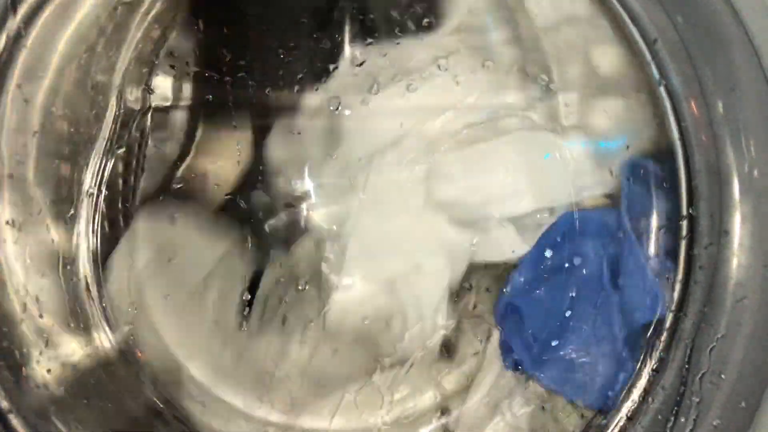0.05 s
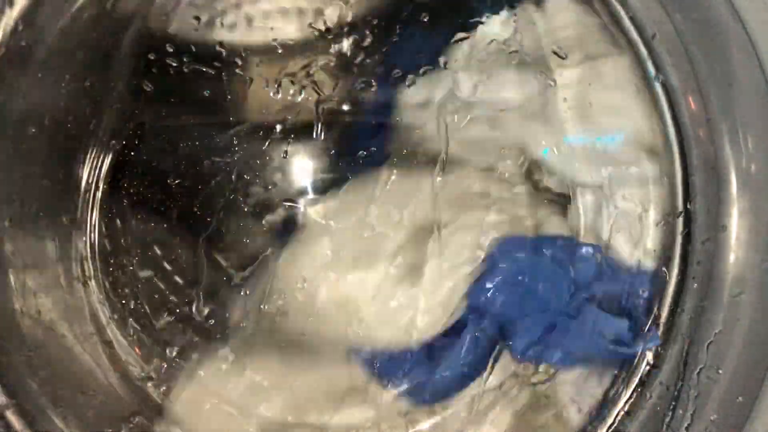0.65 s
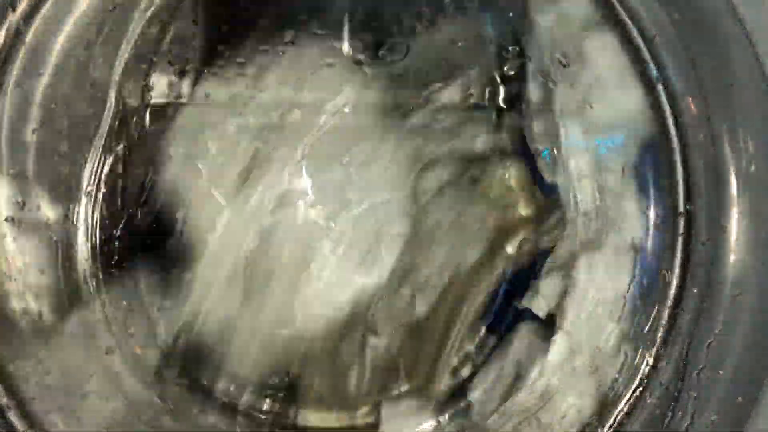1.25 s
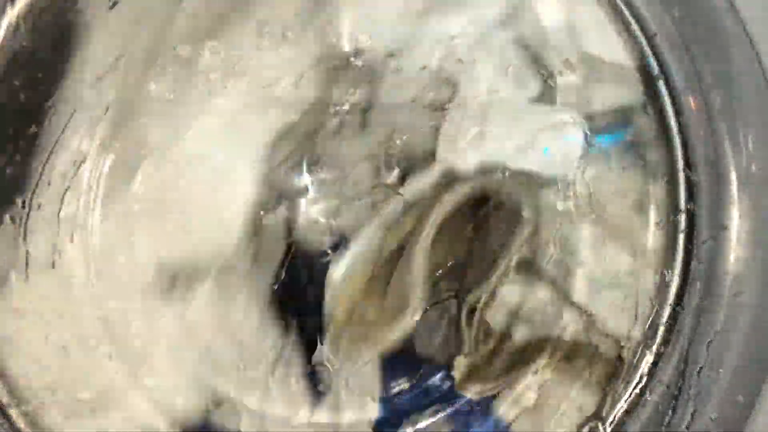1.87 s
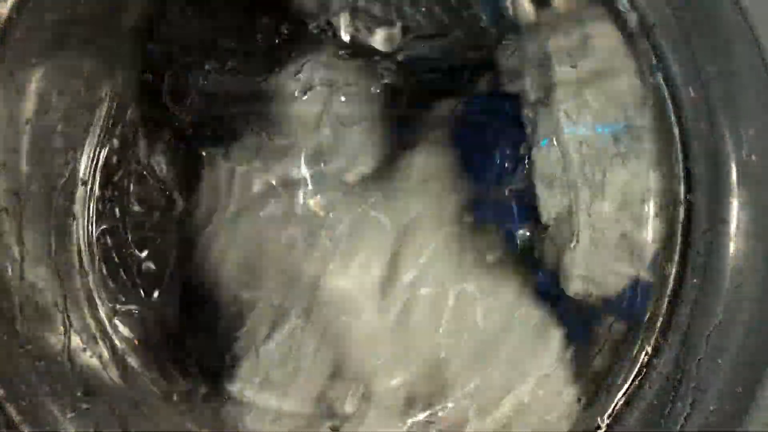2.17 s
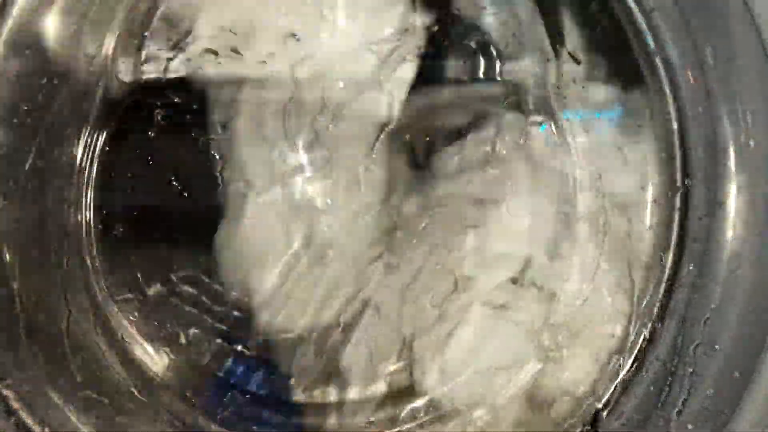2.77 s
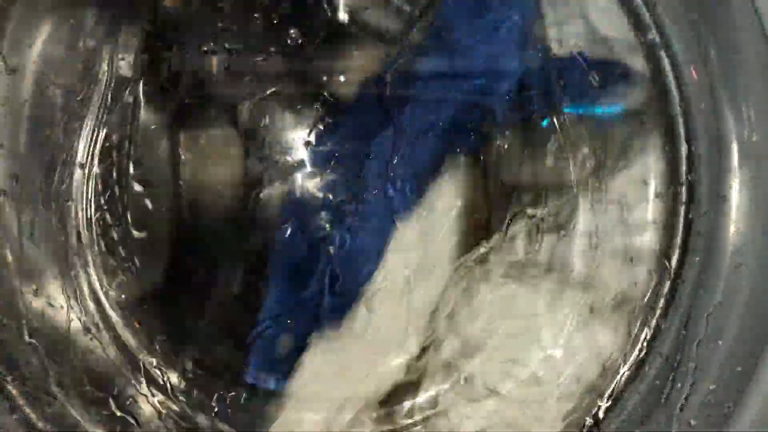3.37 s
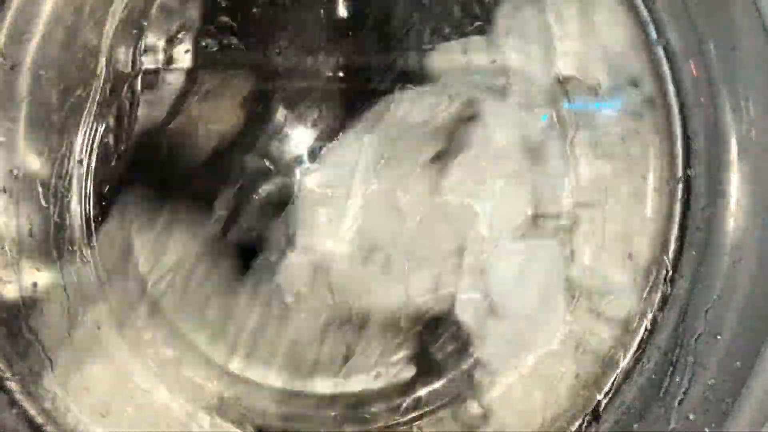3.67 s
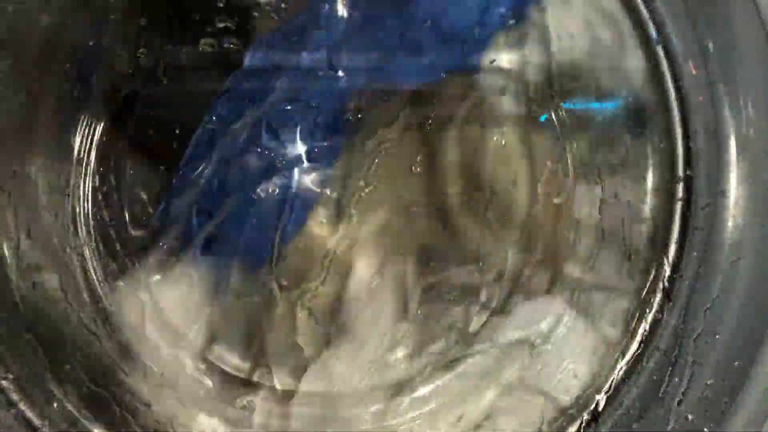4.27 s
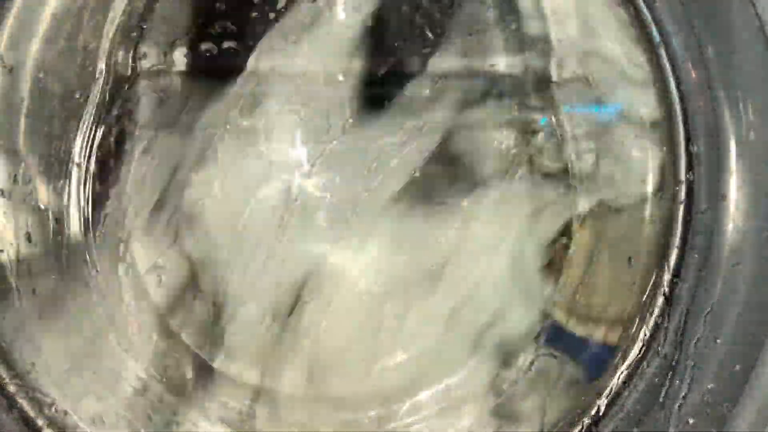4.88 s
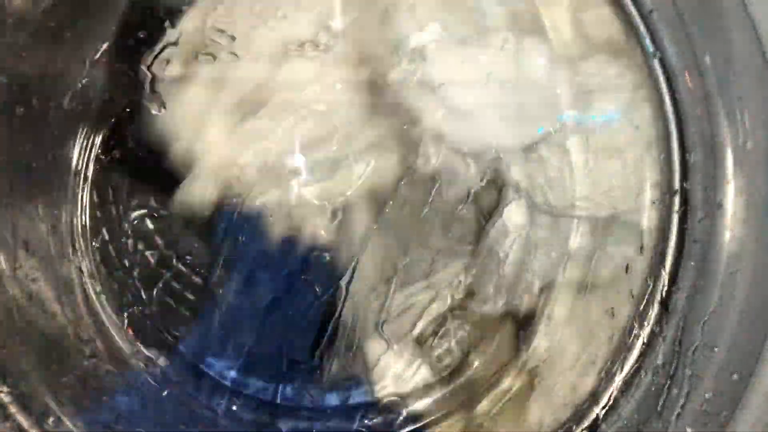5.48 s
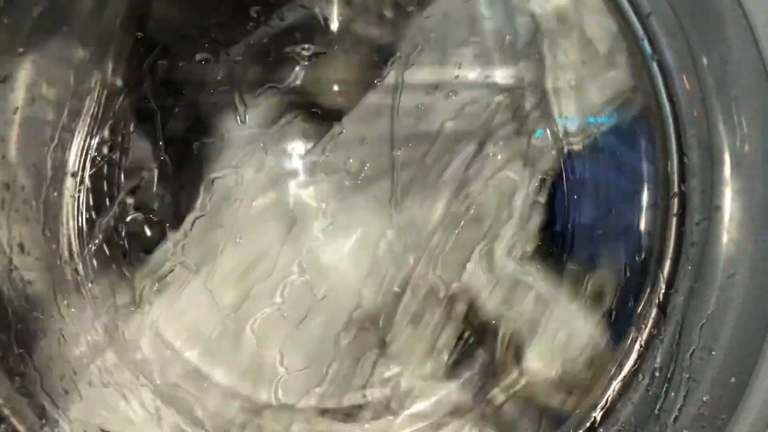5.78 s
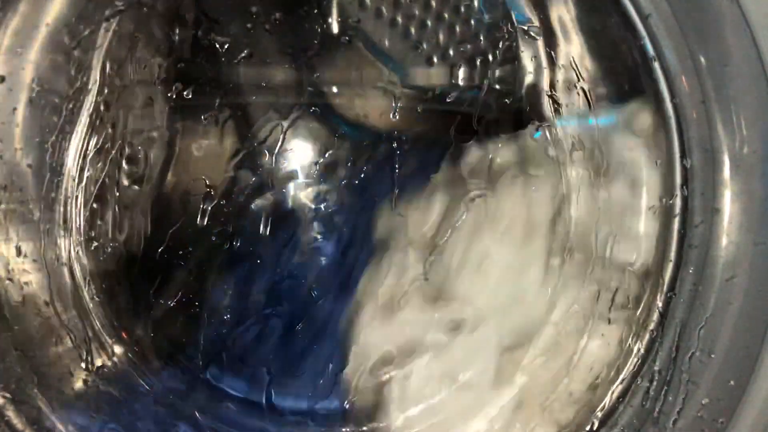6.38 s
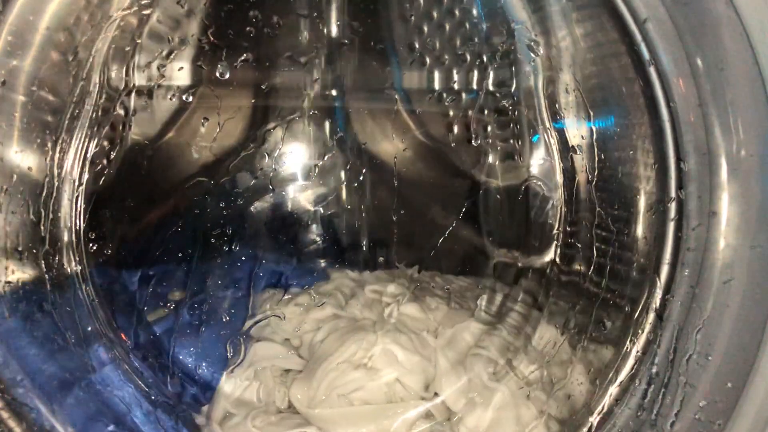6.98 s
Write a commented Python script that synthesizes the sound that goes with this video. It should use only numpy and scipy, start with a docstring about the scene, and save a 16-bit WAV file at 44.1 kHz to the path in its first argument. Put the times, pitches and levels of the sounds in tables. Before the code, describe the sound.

Soaked clothes slap and splash in a droning washer drum until the motor cuts out and the water settles over a quiet hum.

```python
"""Washing machine at the door

One microphone, close to the glass of a front-loader tumbling wet laundry. A drone just below the mains hum
beats against it, water churns in the tub and soaked cloth slaps down at every turn. After a last heavy fall the
drum stops: water drains and fizzes out of the heap over a faint hum."""
import sys
import numpy as np
from scipy import signal
from scipy.fft import rfft, irfft, next_fast_len
from scipy.io import wavfile

SR = 44100
rng = np.random.default_rng(int(sys.argv[2]) if len(sys.argv) > 2 else 0)


def store_pcm(level_fs):
    """Save levels as 16-bit WAV."""
    pcm = np.round(np.clip(level_fs, -1, 1) * 32767).astype(np.int16)
    wavfile.write(sys.argv[1], SR, np.atleast_2d(pcm).T)


N = 319284
TIME = np.arange(N) / SR
MAINS_HUM_HZ, POWER_OFF_S = 99.96, 6.15

# wet cloth landing: peak t/s, rise/s, then relative level/dB of thud, splat and spray
SLAPS = [(0.415, 0.02, -45, -39, -47.5), (0.568, 0.015, -39.5, -36, -46.5), (0.813, 0.015, -60, -53, -48),
         (0.95, 0.016, -63, -45, -51.5), (1.128, .003, -43, -44, -50.5), (1.314, 0.0071, -45, -47, -46),
         (1.38, .028, -43.5, -42, -52), (1.464, 0.018, -48, -42.5, -48.5), (1.747, .007, -42, -39, -51),
         (1.846, 0.021, -43, -36.5, -45.5), (2.375, 0.0062, -45, -43, -45),
         (2.4, 0.0047, -42, -37.5, -44.5), (2.528, .009, -63, -41.5, -47.5),
         (2.643, 0.02, -38.5, -46, -44.5), (2.81, 0.01, -40, -39.5, -45), (3.062, .003, -42, -42.5, -49.5),
         (3.329, .004, -45, -39.5, -47), (3.433, 0.01, -45, -57, -52), (3.505, 0.017, -45.5, -40, -48),
         (3.77, 0.041, -47, -41, -48.5), (3.817, 0.012, -41.5, -46, -48), (4.38, 0.0081, -40.5, -35.5, -47),
         (4.457, 0.0098, -45.5, -39, -50), (4.612, 0.0044, -42.5, -36.5, -46),
         (4.715, 0.023, -46.5, -39.5, -48.5), (5.035, .003, -40, -38, -56),
         (5.337, 0.0082, -38, -38, -44.5), (5.382, 0.012, -40, -38.5, -50.5),
         (5.529, 0.0076, -57, -39, -54), (5.599, 0.009, -56, -44, -48.5), (5.732, 0.013, -39, -34.5, -43.5),
         (5.818, 0.0027, -47, -40.5, -57), (5.961, 0.017, -44, -44, -63), (6.001, 0.0047, -55, -42.5, -43),
         (6.22, 0.0078, -59, -38.5, -52), (6.245, .012, -42, -37, -41.5), (6.43, 0.014, -64, -49.5, -56),
         (6.535, 0.033, -51, -52, -55.5), (6.7, 0.02, -74, -72, -61)]
# spectrum of water splatting out of the cloth: f/Hz, relative level/dB
SPLAT_SPECTRUM = [(500, -37), (900, 11), (1300, 8), (1800, 5.5), (2500, -2.5), (3200, -28), (5000, -9.5)]


def from_db(db):
    """Decibels to gain."""
    return 10 ** (np.asarray(db) / 20)


def rms_one(x):
    """Scale to unit power."""
    return x / np.sqrt(np.mean(x ** 2) + 1e-20)


def in_time(rows):
    """Each column of a curve, sample by sample."""
    times, *columns = np.transpose(rows)
    return [np.interp(TIME, times, column) for column in columns]


def drift(hz):
    """A slow random wander, mostly below hz; rms 1."""
    hop, settle = 40, 2000
    r = np.exp(-2 * np.pi * hz * hop / SR)
    slow = signal.lfilter([1], [1, -2 * r, r * r], rng.standard_normal(N // hop + settle + 2))[settle:]
    return np.interp(np.arange(N) / hop, np.arange(len(slow)), rms_one(slow))


def coloured(x, spectrum):
    """Give a signal a smooth spectrum that rolls off at both ends; rms 1."""
    size = next_fast_len(N)
    hz, db = np.transpose(spectrum)
    bins = np.arange(size // 2 + 1) * SR / size + 1
    curve = np.interp(np.log(bins), np.log(hz), db)
    skirts = np.minimum(bins / hz[0], 1) ** 2 * np.minimum(hz[-1] / bins, 1) ** 2
    return rms_one(irfft(rfft(x, size) * from_db(curve) * skirts, size)[:N])


def resonance(x, hz, width_hz):
    """Two-pole band-pass with gain 1 on top."""
    r = np.exp(-np.pi * width_hz / SR)
    feedback = [1, -2 * r * np.cos(2 * np.pi * hz / SR), r * r]
    return signal.lfilter(np.array([1, 0, -1]) * (1 - r * r) / 2, feedback, x + 1e-18)


def wavering(hz, unsteady, drift_hz):
    """A tone whose strength and phase waver, unsteady from 0 to 1; rms 1."""
    phase = 2 * np.pi * (hz * TIME + rng.random())
    steady = np.sqrt(2 * (1 - unsteady ** 2)) * np.sin(phase)
    wander = drift(drift_hz) * np.sin(phase) + drift(drift_hz) * np.cos(phase)
    return rms_one(steady + unsteady * wander)


def released(seconds):
    """1 while the motor is powered, then a smooth fall."""
    return np.exp(-(np.maximum(TIME - POWER_OFF_S, 0) / seconds) ** 2)


def motor():
    """Drone and mains hum beat under the windings' buzz; at power-off only the drone lingers."""
    # the motor under shifting load: t/s, throb lag/s, drone/dB, hum/dB, buzz/dB, upper buzz lift/dB
    load_curve = [(0.0, -0.036, -33.5, -44, -44, -0.5), (0.18, -0.046, -45, -54, -43, 6),
                  (0.35, 0.03, -37.5, -52, -46.5, -5), (0.6, -0.013, -40.5, -41.5, -41.5, -4),
                  (1.07, 0.035, -36.5, -43.5, -40, -1), (1.45, -0.011, -48, -39, -45.5, 0.5),
                  (2.05, 0.068, -36.5, -45, -43.5, 1.5), (2.4, -0.0069, -42, -42, -41, -5),
                  (2.7, -0.0071, -44, -43, -43.5, 2.5), (3.4, 0.0034, -38.5, -46.5, -44, -0.5),
                  (4.1, -0.028, -38, -41, -44.5, 3.5), (4.45, .035, -39, -43.5, -43, 2.5),
                  (4.95, -0.019, -40, -45, -45.5, 3), (5.55, 0.018, -36.5, -44, -43, 0),
                  (6.0, -0.056, -38.5, -47, -44, 0.5)]
    # buzz of the windings: multiple of the hum, relative level/dB, unsteadiness/0-1
    partials = [(2, 0, 0.4), (3, -5.5, 0.45), (4, -18.5, 1), (5, -18.5, 0.53), (6, -19, 0.52)]
    throb_hz, trough_s = 2.46, 3.58
    lag, drone_db, hum_db, buzz_db, edge_db = in_time(load_curve)
    mains = 2 * np.pi * MAINS_HUM_HZ * TIME
    beat = 2 * np.pi * throb_hz * (TIME - trough_s - lag)
    drone = from_db(drone_db + 0.77 * drift(hz=11)) * np.sin(mains - beat + 0.1 * drift(hz=9.6))
    sideband = from_db(-9) * np.sin(mains + beat)
    hum = from_db(hum_db) * (np.sin(mains) + sideband)
    lowest, *upper = [from_db(db) * wavering(k * MAINS_HUM_HZ, unsteady, drift_hz=13.2)
                      for k, db, unsteady in partials]
    buzz = (lowest + from_db(edge_db) * sum(upper)) * from_db(buzz_db + 0.83 * drift(hz=7.7))
    buzz *= 1 - 0.091 * np.cos(beat)
    return (np.sqrt(2) * hum + buzz) * released(seconds=0.03) - np.sqrt(2) * drone * released(seconds=0.42)


def boom():
    """The tub booms on its springs at its own low pitch."""
    # swell of the boom: t/s, relative level/dB
    swell = [(0.0, -58), (4.1, -55), (4.8, -45), (5.5, -54), (6.5, -46), (7.24, -58)]
    return from_db(in_time(swell)[0] - 7.5) * wavering(70.5, unsteady=0.51, drift_hz=1.6)


def idle():
    """The machine's soft rush and faint hum, which go on after the drum stops."""
    # spectrum of the rush: f/Hz, relative level/dB
    rush_spectrum = [(28, -1), (50, -2), (110, 1.5), (190, 1.5), (260, -4.5), (360, -1), (480, -27),
                     (660, -6.5), (880, -0.5), (1050, -6.5), (1300, -21), (2300, -25), (7000, -47),
                     (15700, -26)]
    hum = wavering(MAINS_HUM_HZ, unsteady=0.46, drift_hz=4.9)
    hum += wavering(2 * MAINS_HUM_HZ, unsteady=1.0, drift_hz=7.3)
    return from_db(-52.5) * coloured(rng.standard_normal(N), rush_spectrum) + from_db(-59.5) * hum


def spurts(per_s, decay_s):
    """Little gushes start at once and die away; centred on 0, spread about 1."""
    starts = rng.exponential(1, N) * (rng.random(N) < per_s / SR)
    gush = signal.lfilter([1], [1, -np.exp(-1 / (decay_s * SR))], starts + 1e-18)
    return np.minimum(rms_one(gush - gush.mean()), 4)


def droplets(per_s, spread_db):
    """Random tiny impacts of uneven size; rms 1."""
    at = np.flatnonzero(rng.random(N) < per_s / SR)
    size, sign = rng.random((2, N), dtype=np.float32)[:, at]
    out = np.zeros(N)
    out[at] = from_db(spread_db * np.minimum(-np.log(1 - size), 4)) * np.sign(sign - .5)
    return rms_one(out)


def bubbles(per_s, spread_db, q, sizes=22):
    """Bubbles of many sizes, each ringing briefly at its own pitch; rms 1."""
    births = droplets(per_s, spread_db)
    size = rng.integers(0, sizes, N)
    pitches = np.geomspace(400, 2800, sizes)
    return rms_one(sum(resonance(births * (size == k), hz, hz / q) for k, hz in enumerate(pitches)))


def shaded(x, depth):
    """Moving folds open and shade six bands at random; rms 1."""
    flicker = sum(drift(hz=17) * resonance(x, hz, hz / 1.6) for hz in np.geomspace(900, 12000, 6))
    return rms_one(x + depth * flicker)


def churn():
    """Water is dragged round with the load: a gurgling wash, a fine spray and drops on the glass."""
    # churning, dying away once the drum rests: t/s, relative level/dB of wash and spray
    flow = [(0.0, -62, -56), (0.2, -47.5, -55.5), (0.6, -43, -54.5), (3.3, -45.5, -54), (5.9, -43.5, -54),
            (6.18, -47, -54.5), (6.35, -50, -61), (6.65, -53.5, -59.5), (6.9, -64, -65.5),
            (7.24, -63.5, -67.5)]
    # spectra of the wash and the spray: f/Hz, relative level/dB
    wash_spectrum = [(28, -32), (45, 2), (70, 11), (140, 7), (250, 6.5), (420, 2), (650, -1), (900, -3.5),
                     (1300, -4), (2000, -11), (3000, -13.5), (6000, -78)]
    spray_spectrum = [(1200, 3.5), (2400, 3.5), (3200, 2.5), (4500, 1), (6500, -1.5), (8500, -4.5),
                      (11000, -9.5), (13000, -13), (15700, -18)]
    wash_db, spray_db = in_time(flow)
    surge = spurts(per_s=35, decay_s=0.012)
    gurgle = rng.standard_normal(N) + from_db(-7) * bubbles(per_s=500, spread_db=1.5, q=17.7)
    patter = rng.standard_normal(N) + from_db(0.5) * droplets(per_s=2500, spread_db=-0.5)
    wash = from_db(wash_db - 0.97 + 0.29 * surge + 1.6 * drift(hz=1)) * coloured(gurgle, wash_spectrum)
    spray = from_db(spray_db + 0.76 + surge) * shaded(coloured(patter, spray_spectrum), depth=0.15)
    drops = sum(resonance(droplets(per_s=9.2, spread_db=3.0), hz, 300) for hz in (7200, 10400, 13800))
    return wash + spray + from_db(spray_db - 19.5) * rms_one(drops)


def tub(x, contact):
    """Tub and door add their own ring, the more the firmer they are touched; the power is kept."""
    # resonances of tub and door: f/Hz, width/Hz, lift/dB at contact 1
    modes = [(414.7, 11, 7.5), (560, 35, 3.5), (767, 68, 7), (846, 37, 7), (1159, 53, 7), (1389, 15, 8.5),
             (1653, 58, 5), (2415, 58, 7.5), (2616, 39, 4.5), (2994, 26, 5), (3360, 57, 5.5),
             (4213, 40, 9.5), (5200, 22, 7), (6500, 93, 5.5), (8250, 84, 7.5), (11420, 120, 7)]
    rung = x + sum((from_db(db * contact) - 1) * resonance(x, hz, width) for hz, width, db in modes)
    return np.std(x) * rms_one(rung)


def slaps():
    """Soaked cloth lands fold by fold: spray flies first, trapped water splats, then the drum thuds."""
    # how fast a slap's power dies away: decay/s of thud, splat and spray
    fall_s = [0.021, 0.017, 0.013]
    lag_s = np.array([[.004], [0], [-.002]])
    power = np.zeros((3, N))
    for peak_s, rise_s, *levels in SLAPS:
        near = slice(max(int((peak_s - .1) * SR), 0), int((peak_s + .2) * SR))
        t = TIME[near] - peak_s - lag_s
        rising = np.exp(-np.abs(t / rise_s) ** 1.86)
        falling = np.exp(-np.abs(t / np.array(fall_s)[:, None]))
        power[:, near] += from_db(levels)[:, None] ** 2 * np.where(t < 0, rising, falling)
    # spectra of the drum's thud and the flying spray: f/Hz, relative level/dB
    thud_spectrum = [(30, -18), (55, -7), (130, 10), (280, 5), (450, 3.5), (800, 0), (1100, -10),
                     (2000, -14.5)]
    spray_spectrum = [(1800, 5.5), (3000, 6), (4300, 1.5), (6000, -4), (8500, -4), (11500, -7.5),
                      (15700, -16)]
    thud, splat, spray = np.sqrt(power)
    thud *= coloured(droplets(per_s=3000, spread_db=5.5), thud_spectrum)
    splat *= coloured(droplets(per_s=4000, spread_db=3.0), SPLAT_SPECTRUM)
    spray *= shaded(coloured(droplets(per_s=6300, spread_db=-2.5), spray_spectrum), depth=0.38)
    return from_db(2.5) * thud + from_db(-5.0) * splat + from_db(0.5) * spray


def smacks():
    """A fold that lands flat smacks the steel just before its slap peaks; the load damps the ring."""
    flat_rise_s, lead_s, t60_s = 0.0096, 0.0032, 0.032
    envelope = np.zeros(N)
    t = np.arange(SR // 10) / SR
    strike = from_db(-60 * t / t60_s) * (1 - np.exp(-t / .0006))
    for peak_s, rise_s, _, splat_db, _ in SLAPS:
        start = int((peak_s - lead_s) * SR)
        flatness = np.exp(-(rise_s / flat_rise_s) ** 2)
        envelope[start:start + len(t)] += flatness * from_db(splat_db + 5.5) * strike
    return envelope * coloured(rng.standard_normal(N), SPLAT_SPECTRUM)


def thumps(rings=9):
    """The heap smothers its impact as it sinks in: the ring falls from a slap to a low thud."""
    # the whole heap dropping at once: t/s, level/dB of each ring, sinking time/s, nominal lowest f/Hz
    falls = [(0.566, -48, 0.024, 294), (2.634, -45, 0.024, 474), (6.236, -38, 0.0225, 117)]
    out = np.zeros(N)
    t = np.arange(SR // 4) / SR
    for at_s, db, sinking_s, lowest_hz in falls:
        for step, hz in enumerate(np.geomspace(1300, lowest_hz, rings)):
            age = t / (0.00081 + 1.84 / hz)   # low rings swell and last longer
            detune = 1 + 0.13 * rng.standard_normal()
            ring = age * np.exp(1 - age) * np.sin(2 * np.pi * (hz * t * detune + rng.random()))
            start = int((at_s + sinking_s * (step / rings) ** 1.437) * SR)
            out[start:start + len(t)] += from_db(db) * ring
    return out


def seeps():
    """Suds fizz through the cloth where the heap presses on it."""
    # water squeezed through the folds: peak t/s, length/s, centre f/Hz, level/dB
    squeezes = [(0.889, .18, 3400, -64), (1.46, 0.16, 2450, -56), (1.6, 0.4, 3120, -64),
                (3.145, 0.079, 3260, -62), (4.542, 0.2, 3300, -60.5), (4.88, 0.17, 3300, -58),
                (5.997, .009, 13700, -48), (6.655, 0.048, 3330, -57.5), (6.83, .057, 3250, -56.5),
                (6.903, .06, 6420, -71), (6.98, 0.24, 3560, -65.5)]
    out = np.zeros(N)
    suds = droplets(per_s=3300, spread_db=1.0)
    for peak_s, length_s, hz, db in squeezes:
        near = np.abs(TIME - peak_s) < 2 * length_s
        width_hz = 0.18 * hz
        fizz = resonance(resonance(suds[near], hz, width_hz), hz, width_hz)
        swell = np.exp(-2 * ((TIME[near] - peak_s) / length_s) ** 2)
        out[near] += from_db(db) * swell * rms_one(fizz)
    return out


def pops():
    """An air pocket bursts from the cloth and rings with two overtones, the higher dying sooner."""
    # bursting pockets: t/s, nominal f/Hz, level/dB, t60/s, overtone share/0-1
    pockets = [(3.667, 2520, -35.5, 0.019, .4), (3.985, 9550, -41.5, 0.022, 0.05),
               (5.24, 11500, -51, 0.012, 0.03), (5.475, 2450, -26.5, 0.022, 0.32),
               (6.508, 8300, -50, 0.023, 0.1)]
    out = np.zeros(N)
    t = np.arange(SR // 10) / SR
    for at_s, hz, db, t60, overtones in pockets:
        # pitch ratio, strength, share of t60
        partials = [(1, 0.98, 1), (1.64, overtones, 1), (2.45, overtones * 1.4, .35)]
        # the pitch rises as the pocket opens
        turns = hz * (t + 0.044 * (t - 0.0019 * (1 - np.exp(-t / 0.0067))))
        ring = sum(strength * np.sin(2 * np.pi * ratio * turns) * from_db(-60 * t / (t60 * life))
                   for ratio, strength, life in partials)
        snap = 0.34 * overtones * rng.standard_normal(len(t)) * np.exp(-t / 0.0027)   # the film tears
        start = int(at_s * SR)
        out[start:start + len(t)] += from_db(db) * (ring + snap) * (1 - np.exp(-t / 0.00013))
    return out


def scene():
    """At the door, in mono: water and laundry sound through the tub, over the motor and idle hum."""
    load = tub(churn(), contact=0.82) + tub(slaps() + smacks(), contact=1.28)
    return (motor() + boom() + load + thumps() + pops() + seeps() + idle())[None]


def record(dry):
    """A steep low-pass on the microphone cuts the highest treble."""
    cutoff_hz = 15700
    return signal.sosfilt(signal.ellip(12, .1, 80, cutoff_hz, fs=SR, output="sos"), dry)


dry = scene()
out = record(dry)
store_pcm(out)
```